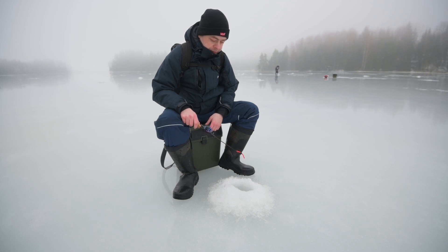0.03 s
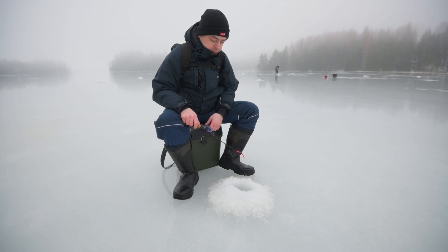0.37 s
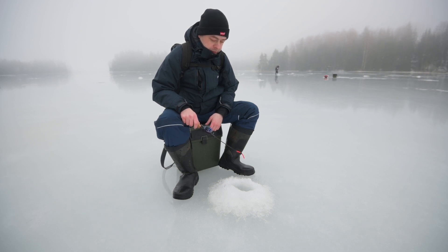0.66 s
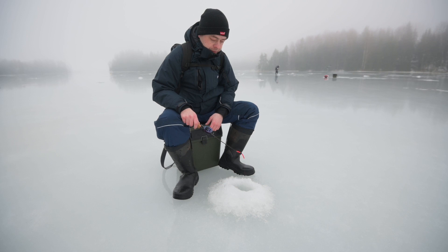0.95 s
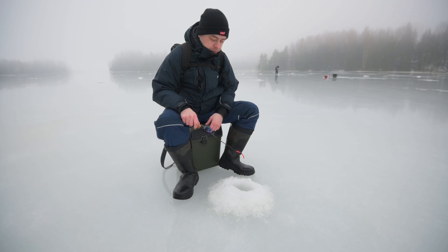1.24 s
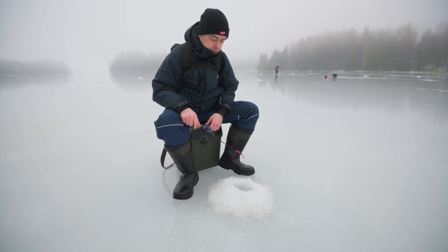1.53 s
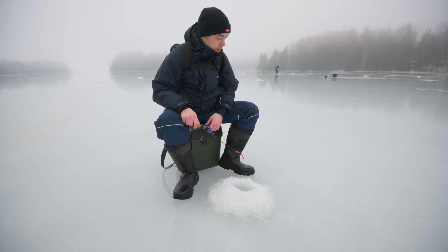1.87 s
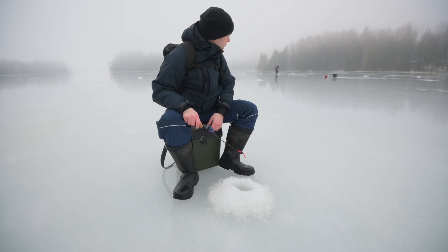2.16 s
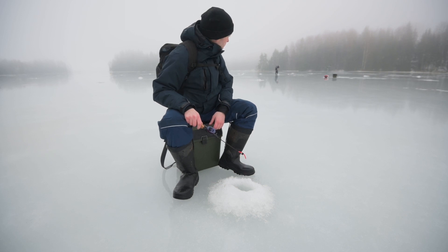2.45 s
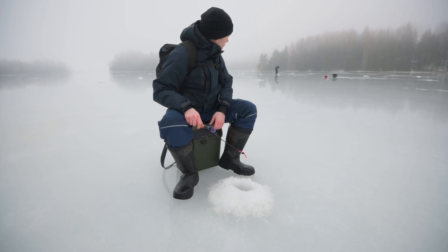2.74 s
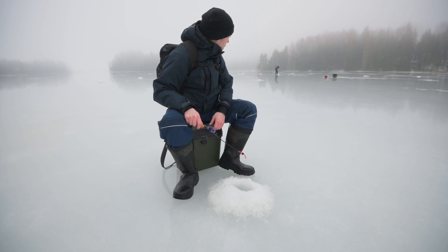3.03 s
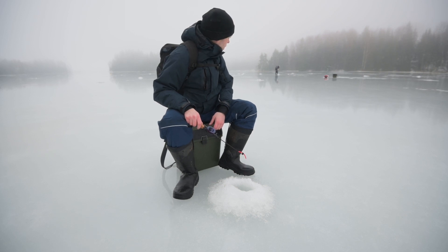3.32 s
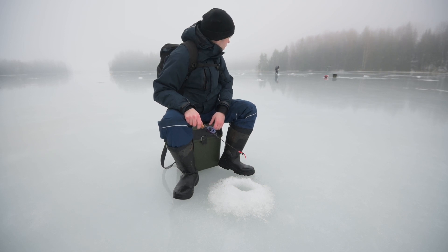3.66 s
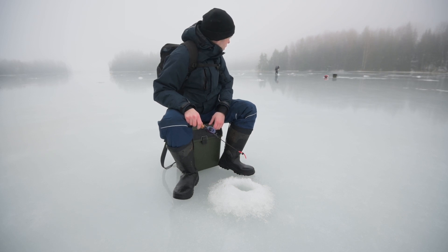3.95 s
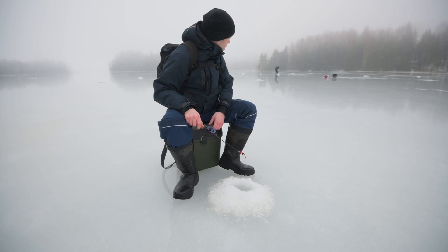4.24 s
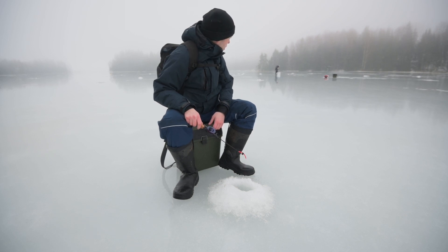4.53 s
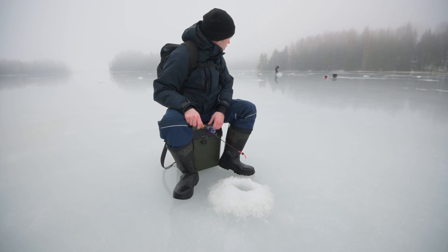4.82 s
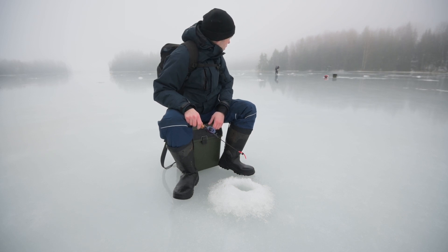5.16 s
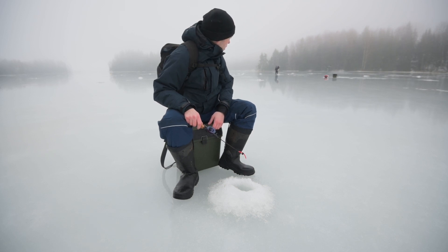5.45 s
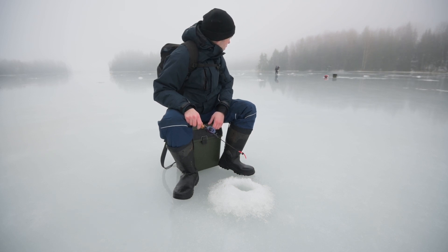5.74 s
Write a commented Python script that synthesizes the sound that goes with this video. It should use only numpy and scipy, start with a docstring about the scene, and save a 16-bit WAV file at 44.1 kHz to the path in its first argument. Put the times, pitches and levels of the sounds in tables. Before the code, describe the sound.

From the start, a cordless drill turns a steel auger through lake ice, with dense crunching, scraping, hissing chips and small ringing squeaks. Its high gear whine sags within the first half second and grows clearer again around 2 seconds. The grinding continues with uneven bites and thin blade squeals, easing slightly. At about 4.4 seconds the cutting stops and the drill runs free at a higher pitch. From 4.6 it coasts down, and the auger knocks sharply, rattles and rubs in its hole with a short sinking squeal. After a brief lull, the drill restarts with clicks at 5.2 seconds and cuts again until about 5.8, ending with a couple of knocks. Light wind rumbles on the microphone throughout, with low thumps near 0.2, 1.1 and 1.5 seconds. A faint, very high steady tone sits behind everything. The space is open, without echo.

```python
"""Cordless ice auger on a lake

A drill turns an auger through ice: the blades crunch, scrape and squeal, the steel tube rings,
the gear whine sags under load. The drill runs free, coasts down while the auger rattles in its
hole, then bites again. Light wind rumbles, with a few low thumps and a thin, very high tone."""
import sys
import numpy as np
from scipy import signal
from scipy.fft import rfft, irfft, next_fast_len
from scipy.io import wavfile

SR = 44100
rng = np.random.default_rng(int(sys.argv[2]) if len(sys.argv) > 2 else 0)


def master(y):
    """Save y as 16-bit WAV."""
    cut = np.clip(np.atleast_2d(y).T, -1, 1)
    pcm = np.round(cut * 32767)  # scale
    wavfile.write(sys.argv[1], SR, pcm.astype(np.int16))


N = 259749
TIME_S = np.arange(N) / SR
NFFT = next_fast_len(N + 8192)
BINS_HZ = np.fft.rfftfreq(NFFT, 1 / SR)
TRIGGER_OFF_S, TRIGGER_ON_S = 4.64, 5.177

# spectra of wind, coarse breaks, blade edges, fine chips: f/Hz, density/dB
WIND_SPECTRUM = [(10, -5), (22, -5.5), (35, 0), (60, -5.5), (100, -9.5), (200, -19), (400, -25),
                 (1000, -29), (4000, -29.5), (16000, -33)]
CRUNCH_SPECTRUM = [(150, -40), (350, -27), (600, -18), (900, -10.5), (1250, -6.5), (1500, 0.5), (1900, 0.5),
                   (2350, -1.5), (2800, -4.5), (3300, -23), (4500, -29)]
SCRAPE_SPECTRUM = [(1800, -24.5), (2700, -5), (3350, 1.5), (3900, -1), (4350, 1), (5200, -3), (5900, 2),
                   (6500, -3), (7000, 1.5), (7600, -10.5), (8400, -8.5), (10000, -35)]
FIZZ_SPECTRUM = [(6500, -30), (7500, -4), (8050, -2), (8550, 0), (9200, -8), (10200, -9.5), (11300, -14),
                 (12300, -12.5), (13500, -15), (14300, -28), (16000, -29)]
# bass thumps: t/s, level/dB, f/Hz, t60/s
THUMPS = [(.195, -23, 52, .25), (.215, -28.5, 115, 0.15), (0.289, -19.5, 36.6, 0.56), (1.105, -24, 42, .12),
          (1.465, -25, 50, .18)]
# gear mesh rate, trigger held: t/s, f/Hz
MESH_RATE = [(0, 5860), (.22, 5050), (.6, 4530), (1.8, 4730), (2.25, 4620), (2.7, 4650), (3.1, 4585),
             (3.52, 4605), (3.95, 4480), (4.42, 4440), (4.485, 5560), (4.6, 5920), (5.26, 5650),
             (5.4, 4500), (5.63, 4610), (5.745, 4400), (5.82, 5520), (5.89, 5400)]
# gear train lines: multiple of mesh rate, level/dB
GEAR_LINES = [(1 / 4, -4), (1 / 2, -5.5), (7 / 10, -11), (22 / 27, -12), (14 / 15, -19), (1, 0),
              (7 / 5, -6)]
# gear whine: t/s, level/dB
WHINE_LEVEL = [(0, -26.5), (.6, -40), (1.65, -41), (1.95, -30), (2.6, -30.5), (3.3, -32), (4.35, -31.5),
               (4.49, -33.5), (4.57, -28), (5.2, -27.5), (5.43, -37), (5.63, -27.5), (5.89, -33)]
# modes of drill housing, spiral flight, blades, blade squeal: f/Hz, width/Hz, level/dB
HOUSING_MODES = [(1110, 28, 1), (2900, 220, 4.5), (4540, 520, 1), (6200, 350, -5)]
FLIGHT_MODES = [(245, 175, -16), (489, 22, -10.5), (711, 74, -1), (1100, 490, -8)]
BLADE_MODES = [(6070, 29, 3.5), (6630, 150, -13.5), (8630, 430, -9)]
SQUEAL_MODES = [(6062, 40, -4.5), (8410, 70, 0)]
# auger tube modes: f/Hz, width/Hz, cutting level/dB, loose level/dB
TUBE_MODES = [(495, 22, -22, -16), (1110, 28, -22, -9), (1200, 24, -13, -24), (1490, 28, -5, -10),
              (1572, 20, -3, 0), (1660, 22, -4, -6), (1750, 16, 0, -4), (1868, 28, -3, -11),
              (1940, 35, -7, -6), (2040, 35, -8, -13), (2160, 28, -4, -12), (2275, 35, -5, -17),
              (2380, 35, -5, -14), (2480, 35, -11, -11), (2870, 40, -15, -17), (4305, 60, -14, -19),
              (6062, 30, -14, -14)]
# auger and chuck knocks: t/s, level/dB, centre f/Hz, t60/s
KNOCKS = [(4.716, -15, 1980, 0.028), (4.722, -17, 6000, .04), (4.727, -14, 4460, 0.028),
          (4.7313, -13.5, 3600, 0.071), (4.805, -33, 1990, .03), (5.105, -42, 2800, 0.033),
          (5.141, -36, 5530, 0.022), (5.181, -32, 3530, 0.022), (5.187, -29, 3720, 0.087),
          (5.208, -21, 4800, .015), (5.218, -29, 4500, .015), (5.271, -19, 4800, 0.017),
          (5.762, -26, 2522, 0.022), (5.834, -20.5, 1960, 0.035)]
# flight groans: centre t/s, half length/s, level/dB, f/Hz
GROANS = [(0.803, 0.097, -38, 705), (1.3, 0.12, -43, 474)]
# tube on the hole wall; blades in the ice: start t/s, length/s, level/dB
RUBS = [(4.663, .03, -24), (4.707, 0.072, -22.5), (4.785, 0.06, -23.5), (4.849, 0.036, -25.5),
        (4.93, 0.039, -25)]
CUTS = [(-.1, 4.52, 0), (5.237, 0.531, 0.5), (5.82, 0.045, -5)]
# grinding effort: t/s, level/dB
EFFORT = [(.03, -25.5), (.22, -20.5), (.6, -21), (1.2, -21), (1.65, -25), (2.3, -23.5), (2.7, -26),
          (3.45, -28.5), (4.0, -27.5), (4.42, -28), (5.4, -25.5), (5.76, -26)]
# blades dig in; blades skid: centre t/s, half length/s, crunch boost or loss/dB
BITES = [(.5, 0.027, 2.5), (1.085, 0.013, 2), (1.155, 0.029, 3.5), (1.28, 0.022, 4.5), (1.46, 0.023, 3.5),
         (1.77, .025, 3), (2.06, 0.031, 2.5), (2.28, .025, 2), (2.64, 0.033, 3.5), (2.825, 0.026, 4.5),
         (2.9, .02, 3.5), (3.04, .04, 3.5), (3.665, .025, 4), (3.855, 0.027, 5.5), (4.06, 0.026, 3),
         (4.23, 0.027, 2), (5.765, 0.015, 5.5)]
SKIDS = [(1.05, 0.014, 3.5), (1.68, 0.033, 2), (2.49, 0.0249, 1.5), (3.335, .04, 4.5)]
# chip sprays; blade squeals: centre t/s, half length/s, level re fizz/dB
SPRAYS = [(0., 0.039, 4.5), (.39, 0.059, 4.5), (.8, 0.058, 3), (1.0, 0.1, 1.5), (1.63, .08, 2.5),
          (1.98, 0.15, 3.5), (2.56, .07, 3), (3.84, .05, 4), (4.04, 0.043, 2.5), (4.27, .04, 2),
          (5.42, 0.11, 1)]
SQUEALS = [(.85, 0.23, -6), (3.2, 0.72, -3), (4.62, 0.13, -1), (5.02, .12, 2)]
# loose auger churns chips: centre t/s, half length/s, level/dB
CHURNS = [(4.52, 0.068, -35), (4.625, 0.1, -29), (4.82, .11, -32), (4.96, 0.033, -32.5), (5.05, 0.078, -47),
          (5.212, 0.015, -34), (5.245, 0.022, -37)]


def amp(db):
    """dB to gain."""
    return 10 ** (np.asarray(db) / 20)


def unit_rms(x):
    """Scale to rms 1."""
    return x / np.sqrt(np.mean(x ** 2) + 1e-20)


def curve(rows):
    """(t/s, value) rows at every sample."""
    return np.interp(TIME_S, *np.transpose(rows))


def humps(rows):
    return sum(height * np.exp(-((TIME_S - t_s) / half_s) ** 2) for t_s, half_s, height in rows)


def swells(rows):
    """Gain from humps with heights in dB, summed in power."""
    return np.sqrt(sum(humps([(t_s, half_s, amp(db))]) ** 2 for t_s, half_s, db in rows))


def contact(start_s, length_s, rise_s, t60_s):
    """Attack, hold, release."""
    attack = np.clip((TIME_S - start_s) / rise_s, 0, 1)
    return attack * amp(-60 * np.maximum(TIME_S - start_s - length_s, 0) / t60_s)


def colour(points):
    """Gain per bin from (f/Hz, level/dB) points."""
    hz, db = np.transpose(points)
    return amp(np.interp(np.log(BINS_HZ + 1), np.log(hz), db))


def resonances(modes, hz=BINS_HZ):
    """Complex response of damped modes."""
    return sum(amp(db) / (1 + 1j * (hz ** 2 - mode_hz ** 2) / (width_hz * hz + 1e-6))
               for mode_hz, width_hz, db in modes)


def shaped(x, response):
    """Filter, then scale to rms 1."""
    return unit_rms(irfft(rfft(x, NFFT) * response, NFFT)[:N])


def wander(rate_hz):
    """Random drift up to rate_hz, rms 1."""
    return shaped(rng.standard_normal(N), 1 / (1 + (BINS_HZ / rate_hz) ** 4))


def crackle(per_s, spread_db):
    """Sparse clicks of random size and sign."""
    sizes = amp(spread_db * np.minimum(rng.exponential(1, N), 4))
    return unit_rms(sizes * rng.choice([-1, 1], N) * (rng.random(N) < per_s / SR))


def thin_tone(hz=15680, rms_db=-48):
    """Steady sine at the top of hearing."""
    return amp(rms_db) * np.sqrt(2) * np.sin(2 * np.pi * hz * TIME_S)


def wind(base_db=-39.5, hold_s=4.03, fall_db_per_s=3.5, gust_db=1.5, gust_hz=4):
    """Low gusts on the microphone and faint open-air hiss, dying down late."""
    level_db = base_db - fall_db_per_s * np.maximum(TIME_S - hold_s, 0) + gust_db * wander(gust_hz)
    return amp(level_db) * shaped(rng.standard_normal(N), colour(WIND_SPECTRUM))


def thumps(rise_s=0.0067):
    """Thumps on the microphone: a few dying bass cycles each."""
    out = np.zeros(N)
    for start_s, db, hz, t60_s in THUMPS:
        t_s = np.maximum(TIME_S - start_s, 0)
        out += amp(db - 60 * t_s / t60_s) * (1 - np.exp(-t_s / rise_s)) * np.sin(2 * np.pi * hz * t_s)
    return out


def coasting_s():
    """Time since trigger release; zero while driven."""
    return np.maximum(TIME_S - TRIGGER_OFF_S, 0) * (TIME_S < TRIGGER_ON_S)


def mesh_rate_hz(sag_hz_per_db=14, race_hz_per_db=49.5, coast_s=0.3, spin_up_s=0.025):
    """The motor slows on bites, races on skids, runs down and up with the trigger."""
    driven_hz = curve(MESH_RATE) - sag_hz_per_db * humps(BITES) + race_hz_per_db * humps(SKIDS)
    spin_up = 1 - np.exp(-np.maximum(TIME_S - TRIGGER_ON_S, 0) / spin_up_s)
    return driven_hz * np.where(TIME_S < TRIGGER_ON_S, np.exp(-coasting_s() / coast_s), spin_up)


def throb(teeth_per_turn=220):
    """Load swing, once per turn of a slow gear: about 20 Hz."""
    return np.sin(2 * np.pi * np.cumsum(mesh_rate_hz()) / SR / teeth_per_turn)


def gear_whine(loaded_hz=4800, free_hz=5500, flutter_db=1.8, throb_db=4, fade_db_per_s=148):
    """Gear lines track the motor, throb with the load and swell across housing modes."""
    swing = throb()
    slack = np.clip((curve(MESH_RATE) - loaded_hz) / (free_hz - loaded_hz), 0, 1)
    jitter = 0.0025 + 0.004 * slack  # unloaded gears rattle
    mesh_hz = mesh_rate_hz() * (1 + 0.003 * wander(20) + jitter * wander(243) + 0.005 * swing)
    cycles = np.cumsum(mesh_hz) / SR
    out = np.zeros(N)
    for multiple, db in GEAR_LINES:
        housing = np.sqrt(sum(abs(resonances([m], multiple * mesh_hz)) ** 2 for m in HOUSING_MODES))
        level_db = db + flutter_db * (1 + slack / 2) * wander(75) + throb_db * multiple * swing
        out += housing * amp(level_db) * np.sin(2 * np.pi * (multiple * cycles + rng.random()))
    return amp(curve(WHINE_LEVEL) - fade_db_per_s * coasting_s()) * out


def knocks(half_width_oct=0.74):
    """Dense, fast-dying steel modes, as bursts of band noise."""
    out, t_s = np.zeros(N), np.arange(4096) / SR
    hz = np.fft.rfftfreq(len(t_s), 1 / SR) + 1
    for start_s, db, centre_hz, t60_s in KNOCKS:
        band = 1 / (1 + (np.log2(hz / centre_hz) / half_width_oct) ** 4)
        noise = unit_rms(irfft(rfft(rng.standard_normal(len(t_s))) * band))
        burst = noise * amp(db - 60 * t_s / t60_s)
        slot = out[round(start_s * SR):][:len(t_s)]
        slot += burst[:len(slot)]
    return out


def groans(width_hz=60):
    """Rubbing ice briefly drives one low mode of the flight."""
    out = np.zeros(N)
    for t_s, half_s, db, hz in GROANS:
        mode = resonances([(hz, width_hz, 0)]) ** 2
        out += swells([(t_s, half_s, db)]) * shaped(rng.standard_normal(N), mode)
    return out


def squeaks(pitches_hz, mean_s, glide):
    """One brief stick-slip tone per pitch, scattered over the whole time."""
    out, count = np.zeros(N), len(pitches_hz)
    for k, hz in enumerate(pitches_hz):
        offset, span, size, bend = rng.random(4)
        t_s = np.arange(0, mean_s * (0.5 + span), 1 / SR)
        warp = 1 + glide * (bend - 0.5) * (t_s / t_s[-1] - 1)
        tone = (0.5 + size) * np.hanning(len(t_s)) * np.sin(2 * np.pi * hz * t_s * warp)
        slot = out[int((k + offset) / count * (N - 1)):][:len(t_s)]
        slot += tone[:len(slot)]
    return unit_rms(out)


def tube(squeak_count=640):
    """Cutting, each squeak sounds one tube mode; loose, wall friction rings them all."""
    hz, width_hz, cutting_db, loose_db = np.transpose(TUBE_MODES)
    odds = np.cumsum(amp(cutting_db) ** 2 * (np.arange(len(hz)) > 2))  # lowest three: too heavy
    pitches_hz = hz[np.searchsorted(odds / odds[-1], rng.random(squeak_count))]
    ring = shaped(crackle(per_s=1100, spread_db=2), resonances(zip(hz, width_hz, loose_db)))
    return squeaks(pitches_hz, mean_s=0.035, glide=0.017), ring


def wall_rub(tube_ring, waver=0.0138, flutter_db=2.5, tone_db=-2):
    """The coasting tube rubs the wall; its rough squeal sinks until it locks on a tube mode."""
    force = np.max([amp(db) * contact(t_s, length_s, rise_s=0.011, t60_s=0.15)
                    for t_s, length_s, db in RUBS], axis=0)
    hz = np.interp(TIME_S, [4.735, 4.825], [1745, 1571]) * (1 + waver * wander(120))
    tone = unit_rms(amp(flutter_db * wander(70)) * np.sin(2 * np.pi * np.cumsum(hz) / SR))
    return force * (tube_ring + amp(tone_db) * tone)


def fractures(per_s, spread_db, smooth):
    """Tiny ice breaks over a share of smooth rubbing."""
    return unit_rms(crackle(per_s, spread_db) + smooth * rng.standard_normal(N))


def cutting_gains():
    """Crunch, scrape and fizz follow the effort in the cut and the churning when loose."""
    engaged = sum(amp(db) * contact(t_s, length_s, rise_s=0.076, t60_s=0.2) for t_s, length_s, db in CUTS)
    cut, churn = amp(curve(EFFORT)) * engaged, swells(CHURNS)
    bite_db = humps(BITES) - humps(SKIDS)
    crunch = np.hypot(cut * amp(-0.97 + bite_db), churn)
    scrape = np.hypot(cut * amp(0.5 + 0.27 * bite_db), churn * amp(-2))
    fizz = np.hypot(cut * amp(-4 + 0.2 * bite_db + humps(SPRAYS)), churn * amp(-3.5))
    return crunch, scrape, fizz


def ringing_crunch(breaks, rubbing, tube_squeaks, flight_from_s=0.47, sink_s=0.45):
    """Ice and steel share the cut's energy; the deepening hole damps the tube, presses the flight."""
    tube_gain = amp(-1.5 - 1.16 * TIME_S)
    flight_gain = amp(-14 + 1.4 * TIME_S) * np.clip((TIME_S - flight_from_s) / sink_s, 0, 1)
    steel = flight_gain * shaped(rubbing, resonances(FLIGHT_MODES)) + tube_gain * tube_squeaks
    ice = shaped(breaks, colour(CRUNCH_SPECTRUM))
    return (ice + steel) / np.sqrt(1 + tube_gain ** 2 + flight_gain ** 2)


def auger(chatter_db=0.35, throb_db=-0.4, spill_db=-5):
    """Chips break off in clumps, heard directly and through tube, flight and blades."""
    crunch_gain, scrape_gain, fizz_gain = cutting_gains()
    grip = amp(chatter_db * wander(40) + throb_db * throb())  # blades catch and slip
    coarse = fractures(per_s=2500, spread_db=0, smooth=0.6) * amp(0.7 * wander(70))
    fine = fractures(per_s=3500, spread_db=1.5, smooth=0.94)
    dust = fractures(per_s=6000, spread_db=2, smooth=0.91) * amp(wander(140))
    spill = crackle(per_s=200, spread_db=3)  # loose auger flings chips
    dust += amp(spill_db) * swells(CHURNS) / (fizz_gain + 1e-9) * spill
    chirps = amp(-11) * squeaks(rng.uniform(2600, 9500, size=2600), mean_s=0.024, glide=0.02)
    blades = 1 + resonances(BLADE_MODES)
    rubbing = rng.standard_normal(N)
    tube_squeaks, tube_ring = tube()
    crunch = crunch_gain * ringing_crunch(coarse, rubbing, tube_squeaks)
    scrape = scrape_gain * shaped(fine + chirps, colour(SCRAPE_SPECTRUM) * blades)
    fizz = fizz_gain * shaped(dust + chirps, colour(FIZZ_SPECTRUM) * blades)
    squeal = fizz_gain * swells(SQUEALS) * shaped(rubbing, resonances(SQUEAL_MODES))
    return grip * (crunch + scrape + fizz + squeal + wall_rub(tube_ring))


def scene(side_db=-15):
    """Open air, no echo; slight stereo width in the treble."""
    tool = auger() + groans() + gear_whine() + knocks()
    mid = tool + wind() + thumps() + thin_tone()
    spread = colour([(2500, -59), (4200, -52), (6000, -7), (8500, -2), (13000, 1)])
    side = amp(side_db) * irfft(1j * rfft(tool, NFFT) * spread, NFFT)[:N]
    return np.array([mid + side, mid - side])


def record(dry, cutoff_hz=16000):
    """Steep low-pass."""
    taps = signal.firwin(1023, cutoff_hz, window=("kaiser", 9), fs=SR)
    return signal.oaconvolve(dry, taps[None], "same")


dry = scene()
out = record(dry)
master(out)
```